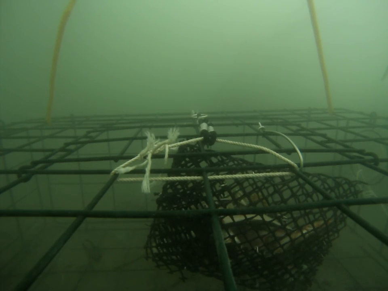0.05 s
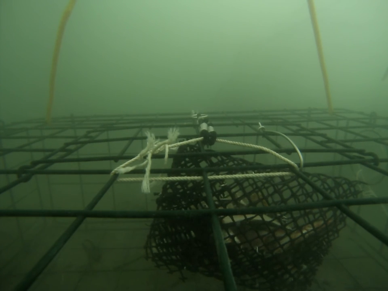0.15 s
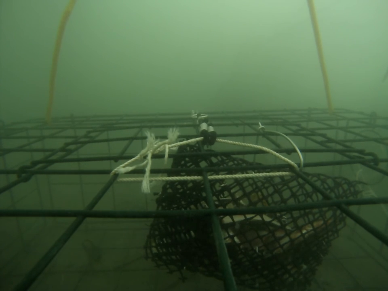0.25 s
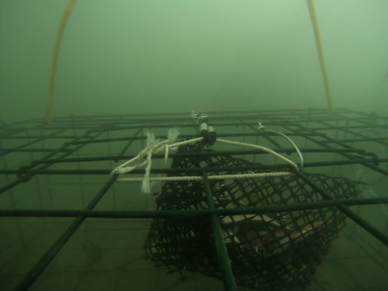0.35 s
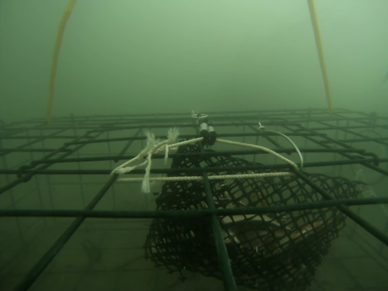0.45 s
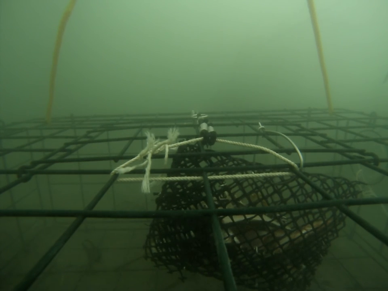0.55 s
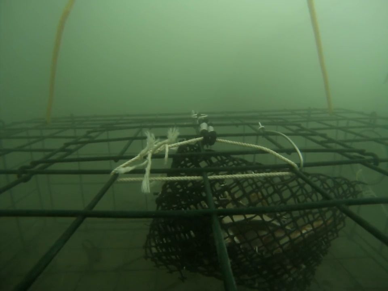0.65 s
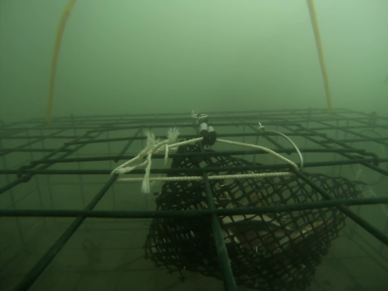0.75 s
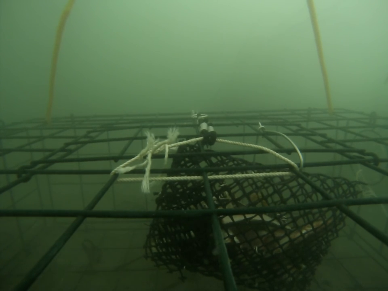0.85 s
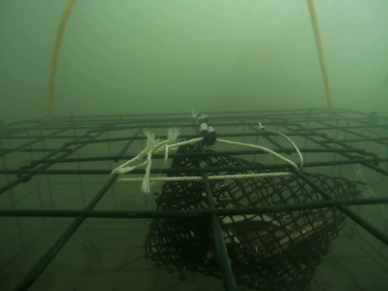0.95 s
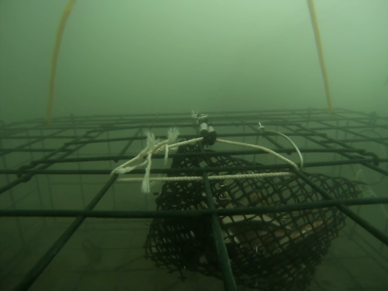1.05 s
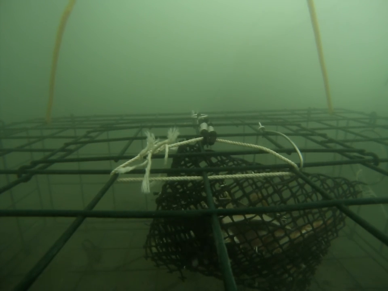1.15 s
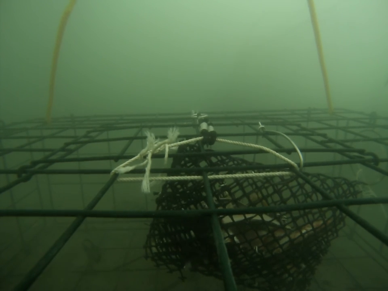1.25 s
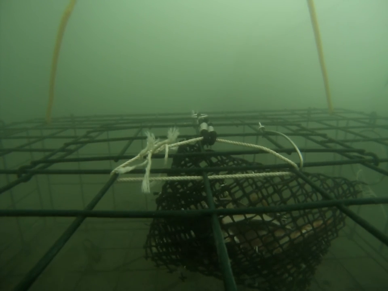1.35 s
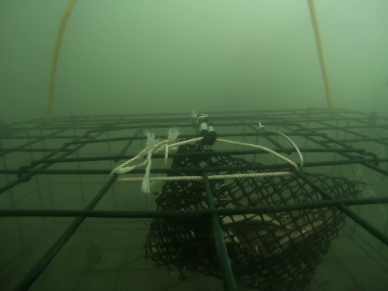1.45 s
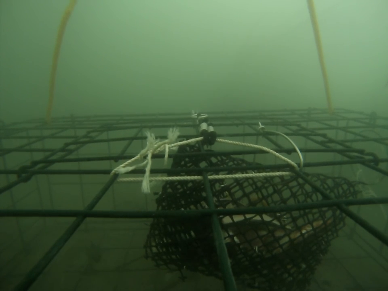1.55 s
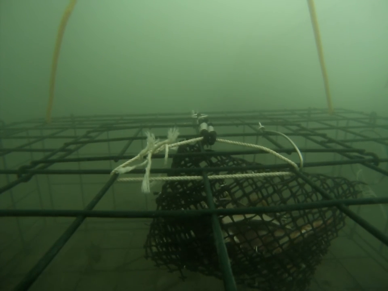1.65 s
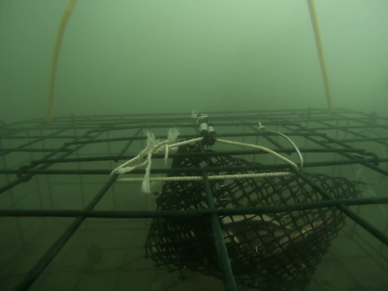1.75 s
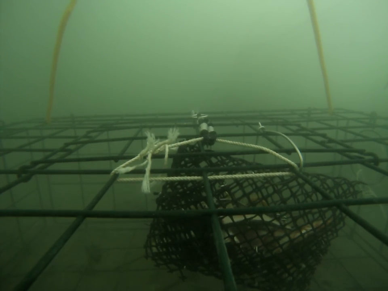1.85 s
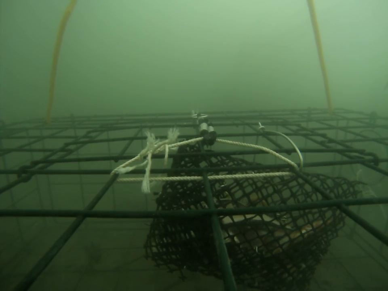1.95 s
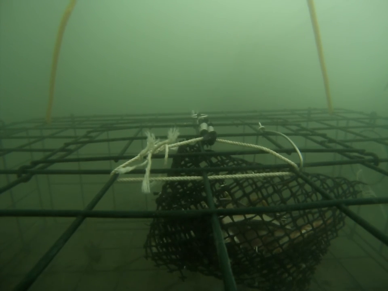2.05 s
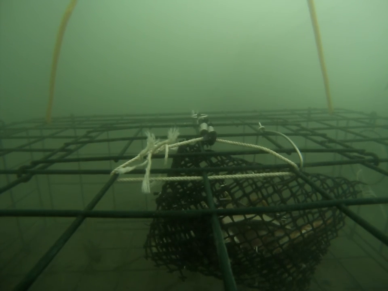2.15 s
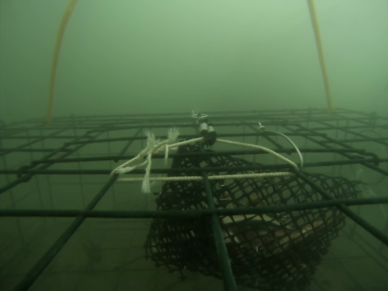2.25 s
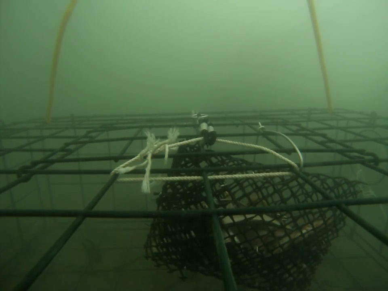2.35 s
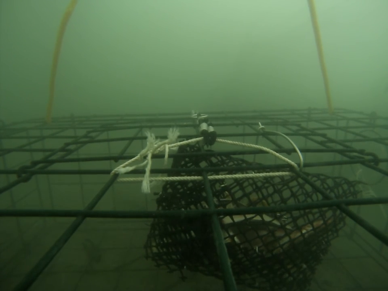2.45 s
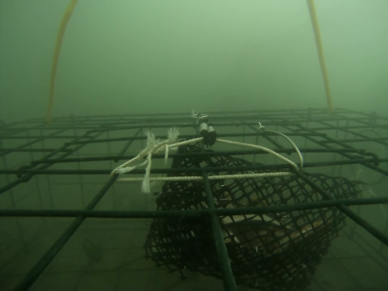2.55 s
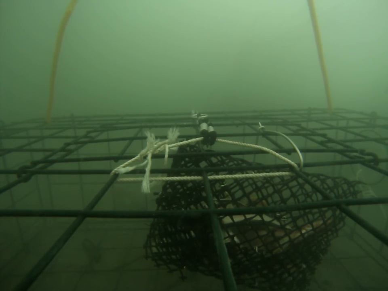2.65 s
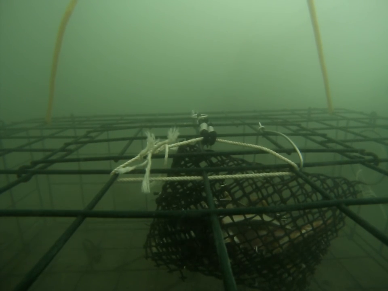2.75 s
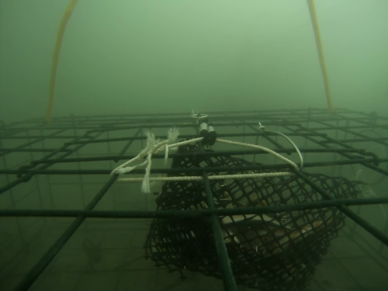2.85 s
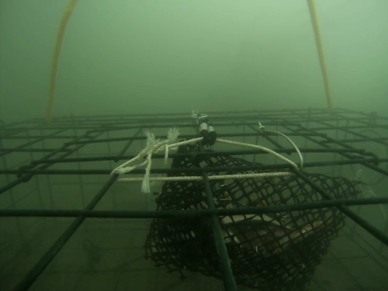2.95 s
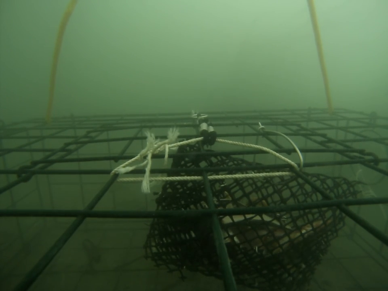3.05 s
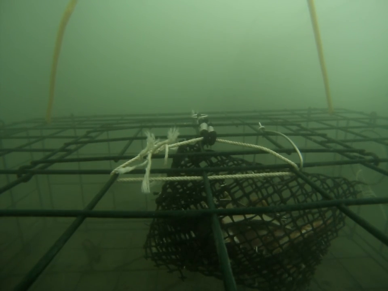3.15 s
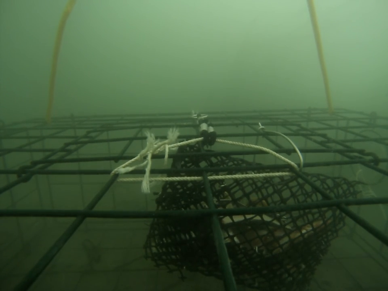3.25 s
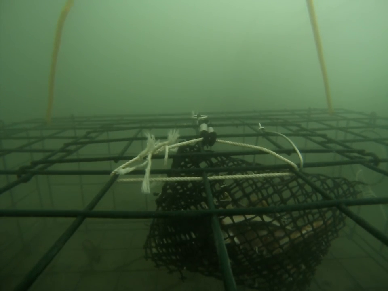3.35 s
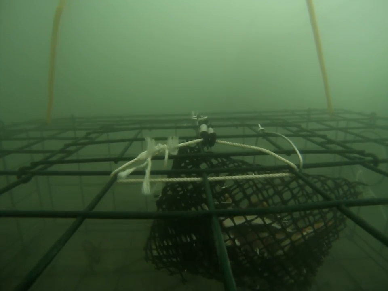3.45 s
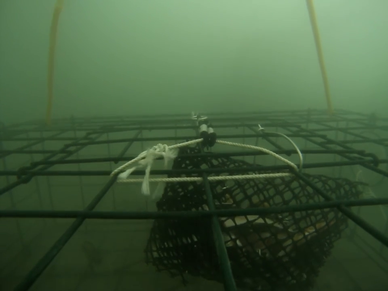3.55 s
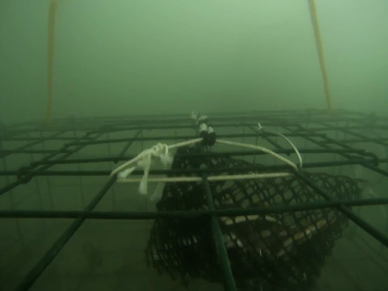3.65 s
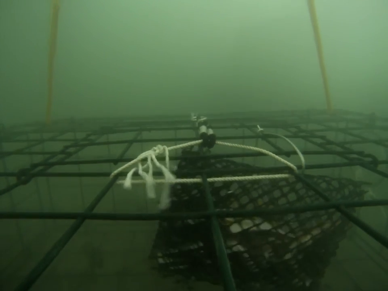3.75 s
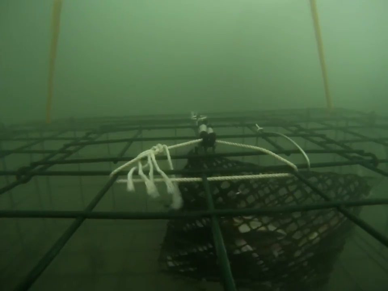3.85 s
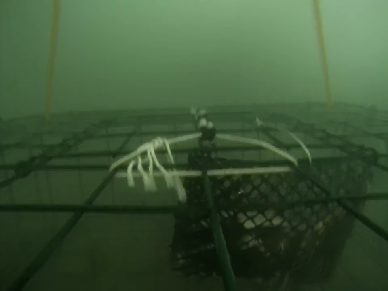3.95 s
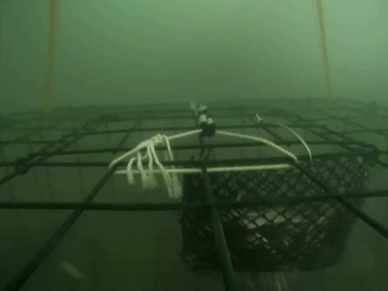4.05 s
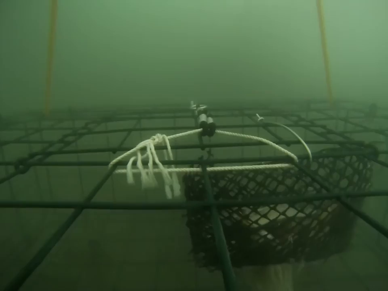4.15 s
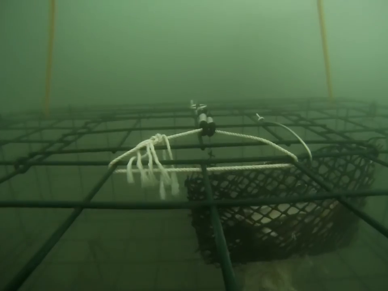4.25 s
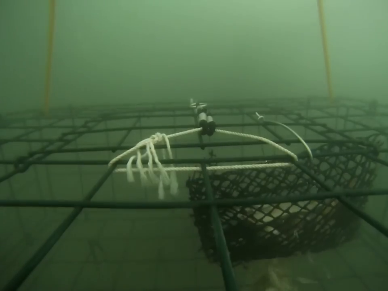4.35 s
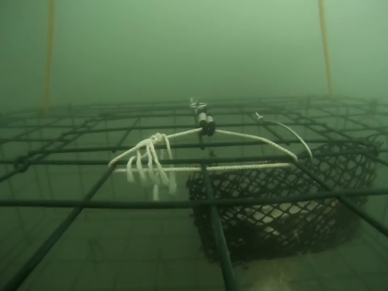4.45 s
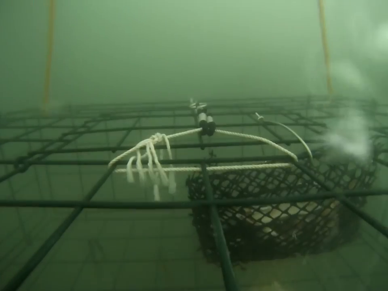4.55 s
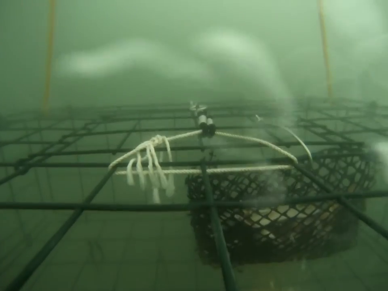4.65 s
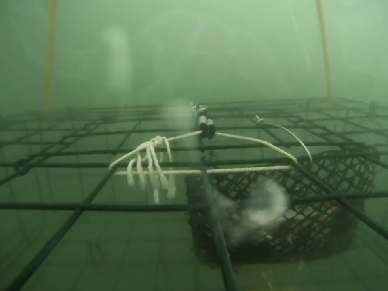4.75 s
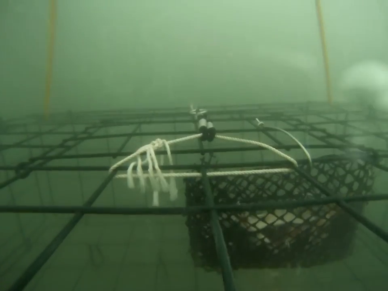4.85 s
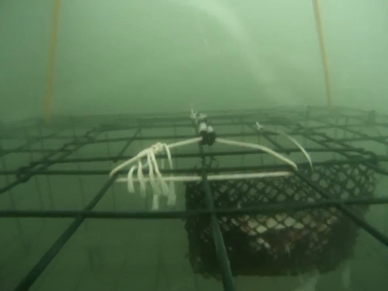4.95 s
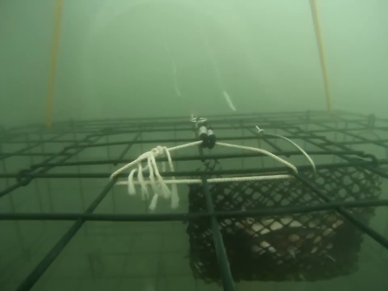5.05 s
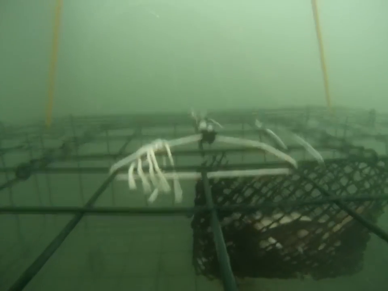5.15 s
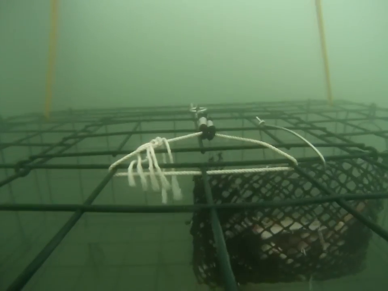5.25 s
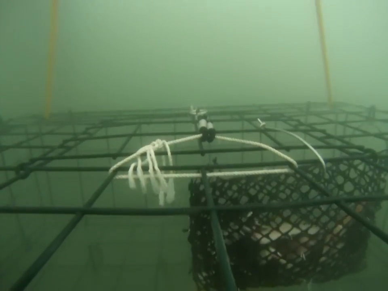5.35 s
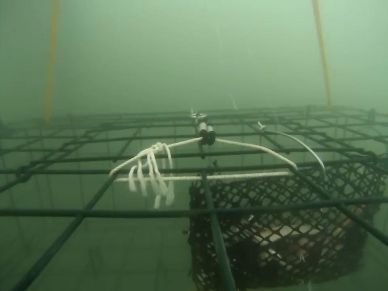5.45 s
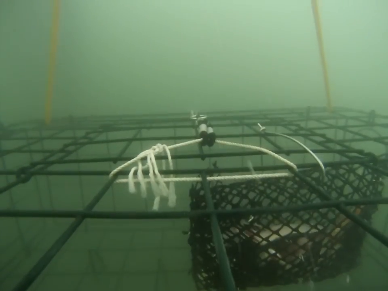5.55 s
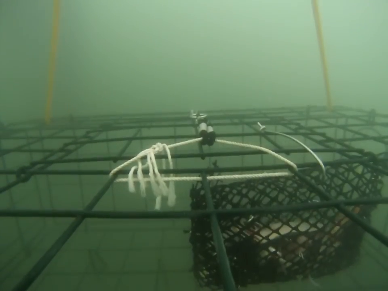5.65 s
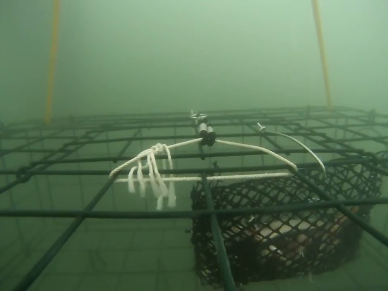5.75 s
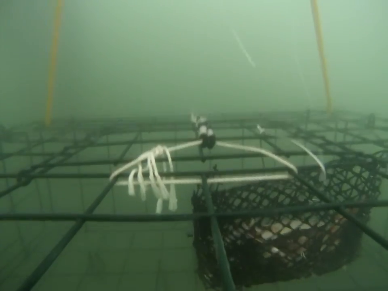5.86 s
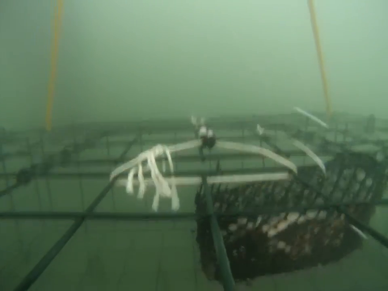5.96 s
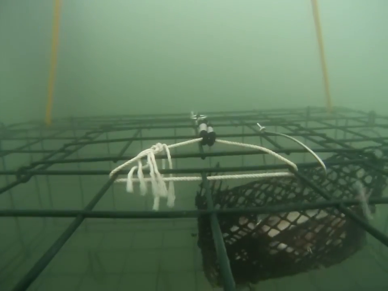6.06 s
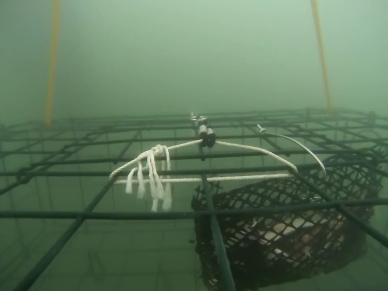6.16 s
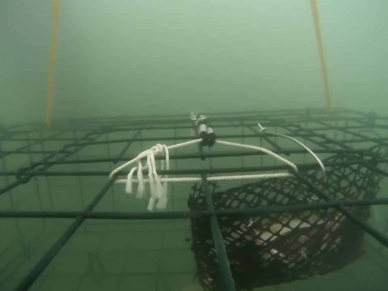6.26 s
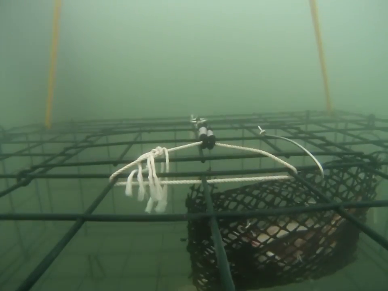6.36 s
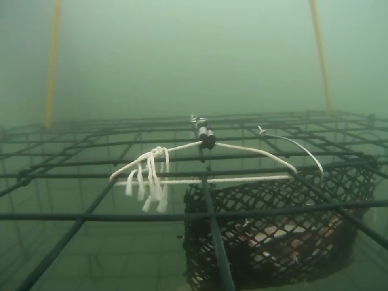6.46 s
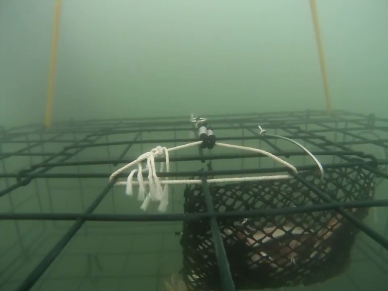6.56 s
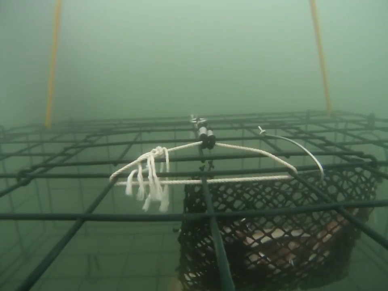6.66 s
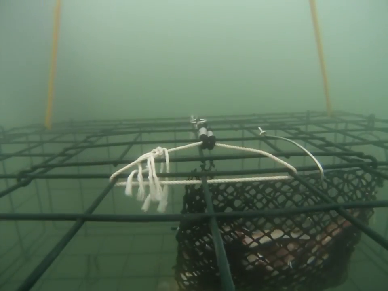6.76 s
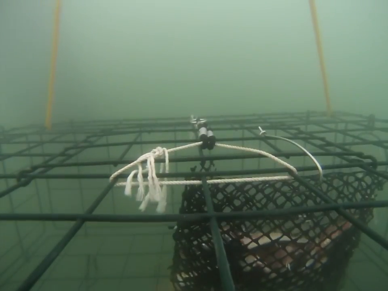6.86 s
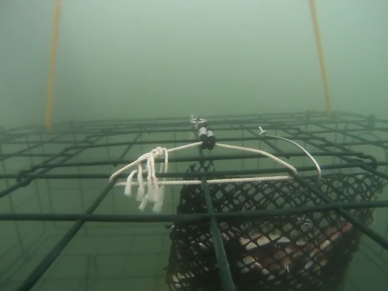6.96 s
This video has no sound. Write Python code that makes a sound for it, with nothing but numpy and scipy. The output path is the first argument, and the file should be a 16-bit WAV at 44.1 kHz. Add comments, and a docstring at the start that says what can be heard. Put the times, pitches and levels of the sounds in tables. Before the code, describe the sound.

From 0 to 3.6 s it is very quiet underwater: a faint low rocking rumble, thin soft hiss, and small irregular dull taps on the wire trap, slightly clearer near 1.0, 2.05, 2.25 and 2.6 s, then almost nothing around 3 s. At 3.65 s a hard, short metallic knock breaks the calm, followed by more at 3.75 and 3.9 s. A deep thump at 4.2 s begins the haul: low throbbing hum, gurgling water rush and bubbles swell, with a very sharp tick at 4.52 s and dense knocks, clicks and wiry rattles to 5.2 s. A heavy knock and hard snap come at 5.4 s, then a flurry of ticks around 5.75-5.85 s. A big low thump lands at 6.2 s; muffled knocks, brief ringing and strong deep buffeting continue at 6.4-6.7 s, and the water still rumbles at the 7 s end. Close, boxy, muffled, mono.

```python
"""Small knocks over a faint low rumble, then a hard jerk, thrumming, rushing water, rattles and ticks.
A wire trap with a camera housing fixed to it lies on the seabed, then is hauled up by its rope.
Contacts and flow are shaped noise driven through resonances of frame, housing, mesh and loose wire;
bubbles, ticks and single ringing modes use short dying sines.
The housing wall muffles whatever shakes it as a whole."""
import sys
import numpy as np
from scipy import signal
from scipy.fft import rfft, irfft, next_fast_len
from scipy.io import wavfile
from scipy.ndimage import uniform_filter1d, map_coordinates

SR = 44100
rng = np.random.default_rng(int(sys.argv[2]) if len(sys.argv) > 2 else 0)


def pcm_store(signal):
    """Save signal as 16-bit PCM."""
    levels = np.round(np.clip(np.atleast_2d(signal), -1, 1) * 32767)
    wavfile.write(sys.argv[1], SR, levels.astype(np.int16).T)


N = 308259
TOP_HZ = 15250  # band limit


def amp(db):
    """Gain of a level in dB."""
    return 10 ** (np.asarray(db) / 20)


def unit(x):
    """x at rms 1."""
    return x / np.sqrt(np.mean(np.abs(x) ** 2) + 1e-20)


def noise():
    """White noise of rms 1 over the scene."""
    return rng.standard_normal(N)


def curve(rows):
    """(t/s, level/dB) rows interpolated to one dB value per sample."""
    t_s, level_db = np.transpose(rows)
    return np.interp(np.arange(N) / SR, t_s, level_db)


def wobble(knots_per_s):
    """Smooth random curve through normally distributed knots."""
    knots = rng.standard_normal(int(N * knots_per_s / SR) + 4)
    return map_coordinates(knots, [np.arange(N) * knots_per_s / SR])


def filtered(x, response):
    """x times a complex response of frequency."""
    m = next_fast_len(N + SR // 2)
    return irfft(rfft(x, m) * response(np.fft.rfftfreq(m, 1 / SR)), m)[:N]


def rung(drive, modes):
    """Drive through parallel resonances, twice for steep skirts; white noise of rms 1 stays near rms 1."""
    def one_pass(f):
        total = 0
        for k, (hz, width_hz, db) in enumerate(modes):
            damping = 1j * f * width_hz
            sign = (-1) ** k  # neighbouring modes alternate in sign
            total = total + sign * amp(db / 2) * damping / (hz * hz - f * f + damping)
        return total

    grid_hz = np.linspace(1, SR / 2, 20000)
    rms_gain = np.sqrt(np.mean(np.abs(one_pass(grid_hz)) ** 4))
    return filtered(drive, lambda f: one_pass(f) ** 2 / rms_gain)


def gritty(per_s, life_s, lumpy_db):
    """Noise of rms 1 whose level jumps at random small contacts and decays with time constant life_s."""
    hits = (rng.random(N) < per_s / SR) * amp(lumpy_db * rng.exponential(size=N))
    shape = signal.lfilter([1], [1, -np.exp(-1 / (life_s * SR))], hits)
    return unit((1 + shape) * noise())


def bursts(times_s, levels_db, t60s, rise_s, blow_db, strike_db=16.5):
    """Sharp contacts, each with chatter noise: a short hard blow, then a slower decay."""
    power, strike = np.zeros(N + SR), np.zeros(N)
    t = np.arange(SR // 3) / SR
    for s, db, t60 in zip(times_s, levels_db, t60s):
        fall = amp(-60 * t / t60) + amp(blow_db - 60 * t / 0.0029)  # blow t60: 2.9 ms
        chatter = amp(db) * fall * (1 - np.exp(-t / rise_s))
        power[round(s * SR):][:len(t)] += chatter ** 2
        strike[round((s + rise_s) * SR)] = amp(db + strike_db)
    return np.sqrt(power[:N]) * noise() + strike


def bubbling(count, low_hz, spread, cycles):
    """Bubbles shed from the mesh: rising blips, start pitch from low_hz to spread * low_hz; rms 1."""
    when, pitch, size = rng.random((count, 3)).T
    hz = (low_hz * spread ** pitch)[:, None]
    t = np.arange(SR // 20) / SR
    fade = amp(-60 * t * hz / cycles) * (1 - np.exp(-t * hz))  # down 60 dB after this many cycles
    blips = (.4 + size ** 2)[:, None] * fade * np.sin(2 * np.pi * hz * t * (1 + t))
    at = (when * N).astype(int)[:, None] + np.arange(len(t))
    return unit(np.bincount(at.ravel(), blips.ravel(), N)[:N])


# noise spectrum: (f/Hz, relative density/dB)
HISS_SPECTRUM = [(300, -2), (800, -4.5), (2000, -11.5), (4000, -16), (6500, -19), (8000, -24.5),
                 (11800, -26), (12600, -36), (15500, -47)]


def hiss():
    """The microphone's own noise: white noise given a falling spectrum."""
    hz, db = np.transpose(HISS_SPECTRUM)
    shaped = filtered(noise(), lambda f: amp(np.interp(np.log(f + 1), np.log(hz), db)))
    return amp(-60.5) * unit(shaped)


# slow rocking of the housing: (t/s, level/dB)
ROCKING = [(0, -40.5), (1.5, -38.5), (3.1, -42), (3.35, -35.5), (3.93, -35.5), (4.3, -34), (4.55, -32.5),
           (6.99, -29.5)]
# buffeting by moving water: (t/s, level/dB)
BUFFET = [(0.0, -52.5), (2.74, -67), (3.0, -61.5), (4.05, -39.5), (4.19, -28.5), (4.73, -26), (5.99, -29),
          (6.17, -26), (6.42, -17.5), (6.6, -32.5), (6.65, -18), (6.72, -22), (6.99, -28.5)]


def sway():
    """The housing rocks slowly; moving water buffets it: two low, broad noise resonances."""
    rocking = rung(noise(), [(13.5, 12.7, 0)])
    rocking = filtered(rocking, lambda hz: 1 / (1 + (hz / 25) ** 5))
    buffet = rung(amp(3.0 * wobble(12)) * noise(), [(42.0, 210, 0)])
    return amp(curve(ROCKING)) * unit(rocking) + amp(curve(BUFFET)) * unit(buffet)


# water and grit through the trap: (t/s, strength/dB)
FLOW = [(0.0, -46), (0.15, -52.5), (0.84, -60.5), (1.56, -50), (1.81, -52.5), (2.55, -54), (2.7, -45),
        (3.15, -54), (3.7, -51), (3.87, -36), (3.93, -30.5), (4.3, -28), (4.59, -18.5), (4.75, -23),
        (5.04, -20), (5.41, -26), (5.74, -19), (5.94, -23.5), (6.01, -25), (6.33, -24.5), (6.48, -24.5),
        (6.53, -28.5), (6.61, -29.5), (6.66, -27.5), (6.695, -32), (6.76, -25.5), (6.84, -33), (6.95, -23),
        (6.99, -28.5)]
FULL_FLOW_DB = -24  # strength at which with_flow returns level_db unchanged


def with_flow(level_db, grows_db_per_db):
    """A level in dB that rises and falls with the flow."""
    return level_db + grows_db_per_db * (curve(FLOW) - FULL_FLOW_DB)


def mesh_gain():
    """The mesh grows faster than the flow strength: 1.43 dB per dB."""
    return amp(with_flow(-34.5, 1.43))


# steady drive of the frame's two lowest modes: (t/s, level/dB)
THRUM = [(0.0, -43), (0.6, -57.5), (3.05, -57), (3.7, -29.5), (4.0, -34.5), (4.4, -24), (4.94, -27.5),
         (5.2, -31.5), (5.5, -23.5), (5.82, -34.5), (6.1, -37), (6.42, -26.5), (6.6, -36.5), (6.99, -25.5)]
# jerks on the rope: (peak t/s, level/dB, rise/s, lean to the upper mode/dB)
TUGS = [(0.88, -51.5, 0.087, -0.5), (1.15, -44, 0.087, -3), (1.73, -42, 0.056, -0.5),
        (1.95, -41, 0.034, -2), (2.07, -38.5, 0.046, 2.5), (2.21, -39.5, 0.053, 1.5),
        (2.592, -39, 0.094, -2), (3.18, -50, 0.025, 4.5), (3.3, -41, 0.013, 4), (3.449, -42.5, 0.038, 6),
        (3.832, -28.5, 0.043, -6), (4.111, -27.5, 0.055, 5), (4.24, -19.5, 0.015, 2.5),
        (4.269, -25, 0.043, 3), (4.38, -33, 0.039, -6), (4.46, -28, 0.03, -5), (4.53, -31, 0.012, 0),
        (4.58, -23.5, 0.038, 0.5), (4.68, -24, 0.031, 10), (4.8, -27, 0.022, 11), (4.88, -27, 0.038, 7),
        (4.955, -15, 0.021, -0.5), (5.07, -22, 0.032, 1.5), (5.16, -26, 0.03, -5), (5.25, -22, .025, -5),
        (5.31, -19.5, 0.046, 7.5), (5.42, -21.5, 0.059, -3), (5.52, -20.5, 0.033, -4),
        (5.63, -17.5, 0.039, 2), (5.728, -19, 0.032, 6), (5.83, -20, 0.028, 5.5), (5.9, -22, 0.028, -2),
        (6.66, -18.5, 0.017, -3), (6.95, -30, 0.015, 4)]
TUG_FALL_RISES = 1.49  # fall time / rise time
LOWER_DB, UPPER_DB, UPPER_GROWS_DB_PER_DB, FLUTTER_DB = -3, -3, 0.12, 1.5


def tugs(side):
    """Gaussian swells of the drive as jerks set the frame swinging; side: -1 lower mode, +1 upper."""
    t, swells = np.arange(N) / SR, np.zeros(N)
    for s, db, rise_s, lean_db in TUGS:
        width_s = np.where(t < s, rise_s, TUG_FALL_RISES * rise_s)
        swells += amp(db + side * lean_db) * np.exp(-((t - s) / width_s) ** 2)
    return swells


def evened(x):
    """x with its 40 ms level swings reduced; rms 1."""
    power = uniform_filter1d(unit(x) ** 2, size=SR // 25)
    return unit(x / np.sqrt(power + .15))


def thrum():
    """Eddies behind the bars and rope tugs drive two frame modes, more evenly than pure chance."""
    steady = amp(curve(THRUM))
    lower_db = LOWER_DB + FLUTTER_DB * wobble(13)
    upper_db = with_flow(UPPER_DB, UPPER_GROWS_DB_PER_DB) + FLUTTER_DB * wobble(11)
    lower = evened(rung(noise(), [(98.6, 32, 0)]))
    upper = evened(rung(noise(), [(139.8, 35.3, 0)]))
    return (steady + tugs(-1)) * amp(lower_db) * lower + (steady + tugs(1)) * amp(upper_db) * upper


# modes of frame, housing, lower mesh, upper mesh: (f/Hz, width per pass/Hz, relative level/dB)
FRAME_MODES = [(218.1, 23, 5), (337, 119.5, 0.5)]
HOUSING_MODES = [(594, 277, -2.5), (766, 102.4, 9), (810, 149, -3)]
LOWER_MESH_MODES = [(1011, 173, 11), (1202, 417, 9.5), (1513, 350, 5.5)]
UPPER_MESH_MODES = [(1692, 294, 1), (2195, 320, 4), (2630, 250, -5.5)]
# sharp modes of the trap: (f/Hz, relative level/dB)
TRAP_MODES = [(598, -7), (710, 0.5), (820, 1), (940, -11.5), (1120, -5.5), (1245, -4.5), (1475, -8),
              (1725, -14.5), (1840, -7.5), (2180, -12.5), (2400, -15.5)]


def drag():
    """Flow and grit shake frame, housing and mesh with a shared surge; bubbles gurgle."""
    surge = amp(1.8 * wobble(11))
    shake = surge * gritty(per_s=90, life_s=.008, lumpy_db=.7)
    frame = amp(-5.5) * rung(shake, FRAME_MODES) + amp(-9.0) * rung(shake, HOUSING_MODES)
    frame += amp(-14.0) * bubbling(count=1400, low_hz=520.0, spread=1.7, cycles=41)  # larger bubbles
    frame += amp(-17.5) * rung(shake, [(hz, 30, db) for hz, db in TRAP_MODES])
    fine = surge * gritty(per_s=200, life_s=.003, lumpy_db=2.5)
    mesh = amp(-7.0) * rung(fine, LOWER_MESH_MODES) + amp(-11.0) * rung(fine, UPPER_MESH_MODES)
    mesh += amp(-14.0) * bubbling(count=700, low_hz=1450, spread=1.7, cycles=45)
    return amp(curve(FLOW)) * frame + mesh_gain() * mesh


def specks(per_s):
    """Sand grains and tiny bubbles strike the housing: sub-millisecond noise clicks, rms 1."""
    hits = (rng.random(N) < per_s / SR) * amp(np.minimum(6 * rng.exponential(size=N), 11))
    clicks = signal.lfilter([1], [1, -np.exp(-1 / (.0006 * SR))], hits) * noise()
    return unit(rung(clicks, [(7000, 8000, 0)]))


# loose wire modes: (f/Hz, width per pass/Hz, relative level/dB)
WIRE_MODES = [(2720, 220, -5.5), (3093, 120, 2.5), (3370, 110, -1), (3780, 130, -3.5), (4156, 180, -6.5),
              (4925, 180, -9), (5480, 250, -11.5), (6700, 700, -20), (7380, 240, -16)]


def fizz():
    """Flow hums in the loose wire, sheds fine bubbles and throws specks at the housing."""
    hum = rung(gritty(per_s=150, life_s=.004, lumpy_db=3), WIRE_MODES)
    spray = bubbling(count=260, low_hz=2600, spread=1.4, cycles=60)
    return mesh_gain() * (amp(-27.5) * hum + amp(-29.5) * spray + amp(-44.0) * specks(per_s=14))


# low single thumps of the housing: (middle t/s, level/dB, f/Hz)
THUMPS = [(4.2275, -5.5, 138), (5.425, -9.5, 130), (6.2064, -4, 117), (6.656, -13.5, 120)]
THUMP_HALF_CYCLES = 0.42  # half length of a thump, in cycles


def thumps():
    """Each thump is one swing forth and back without ring: a sine under a narrow Gaussian."""
    t, out = np.arange(N) / SR, np.zeros(N)
    for s, db, hz in THUMPS:
        cycles = (t - s) * hz
        out -= amp(db) * np.sin(2 * np.pi * cycles) * np.exp(-(cycles / THUMP_HALF_CYCLES) ** 2)
    return out


# a wire snaps against the housing: (t/s, level/dB)
SNAPS = [(5.4237, -3), (5.4285, -2.5)]
# housing shell modes: (f/Hz, width per pass/Hz, relative level/dB)
SHELL_MODES = [(1520, 540, 2.5), (3430, 700, -6.5), (4900, 500, -7), (7550, 1500, -25)]


def snaps():
    """A one-sample hard contact rings all the shell modes."""
    t_s, db = np.transpose(SNAPS)
    blows = np.zeros(N)
    blows[np.round(t_s * SR).astype(int)] = amp(db)
    return rung(blows, SHELL_MODES)


# ticks, short pitched rings and bright clicks: (t/s, level/dB, start f/Hz)
TICKS = [(2.311, -41, 2400), (4.059, -22.5, 3140), (4.226, -41.5, 5640), (4.228, -48, 11100),
         (4.3654, -35.5, 4300), (4.366, -41, 8500), (4.366, -42, 12130), (4.427, -21, 1690),
         (4.4725, -30.5, 7470), (4.5247, -3, 2100), (4.541, -31, 3900), (4.56, -16, 1710),
         (4.5608, -46, 13100), (4.573, -8.5, 2090), (4.6103, -35, 5210), (4.6143, -13.5, 1900),
         (4.6326, -33, 7730), (4.631, -17, 2030), (4.7113, -24.5, 4430), (4.7372, -52, 10000),
         (4.7378, -20, 2480), (4.8586, -11.5, 2015), (4.864, -40, 6310), (4.8747, -38, 5440),
         (4.921, -41, 11000), (4.946, -13.5, 2100), (5.1262, -8, 2070), (5.41, -30, 2770),
         (5.46, -46, 4700), (5.3905, -37.5, 6840), (5.3937, -15.5, 2130), (5.572, -22, 1800),
         (5.654, -21.5, 1960), (5.499, -36, 7200), (5.506, -46, 13500), (5.5819, -35.5, 6730),
         (5.746, -20, 1750), (5.76, -19, 1800), (5.77, -17.5, 1740), (5.776, -33, 3250), (5.784, -17, 1750),
         (5.787, -43, 8900), (5.7994, -13.5, 1830), (5.809, -16.5, 1910), (5.821, -18, 1740),
         (5.834, -19.5, 1850), (5.9, -26, 1750), (5.9478, -26.5, 3190), (6.2089, -44.5, 7500)]
SNAP_DB, SNAP_T60_S = 10.5, 0.0066
FADE_CYCLES_AT_2KHZ, FADE_EXPONENT = 32.8, 0.3  # higher pitches ring for more cycles


def ticks():
    """Each tick snaps, a filtered noise burst, and rings briefly at its own slightly rising pitch."""
    out, t = np.zeros(N + SR), np.arange(SR // 12) / SR
    for s, db, hz in TICKS:
        cycles = FADE_CYCLES_AT_2KHZ * (hz / 2000) ** FADE_EXPONENT
        build = (1 - np.exp(-t * hz / 2.18)) ** 2  # over a few cycles
        ring = amp(4 - 60 * t * hz / cycles) * np.sin(2 * np.pi * hz * t * (1 + .8 * t))
        snap = amp(SNAP_DB - 60 * t / SNAP_T60_S) * rng.standard_normal(len(t))
        snap = signal.lfilter(*signal.butter(7, min(1.3 * hz, TOP_HZ), fs=SR), snap)
        snap = signal.lfilter(*signal.butter(1, hz / 3, fs=SR), snap)  # strongest below the ring
        out[round(s * SR):][:len(t)] += amp(db) * (build * ring + snap)
    return out[:N]


# loose wire slaps: (t/s, level/dB)
RATTLES = [(3.654, -50.5), (3.8817, -41.5), (4.426, -42), (4.515, -34), (4.56, -38.5), (4.6037, -34.5),
           (4.646, -38), (4.6883, -40), (4.827, -45), (4.923, -45), (4.9854, -37.5), (5.0325, -37.5),
           (5.064, -37.5), (5.108, -41), (5.16, -39.5), (5.3228, -47), (5.5536, -42), (5.6035, -38),
           (5.6335, -40), (5.675, -52), (5.721, -45.5), (5.7748, -40.5), (5.8203, -34), (5.898, -45.5),
           (6.3783, -41.5)]


def rattles():
    """Loose wire slaps the frame, ringing wire and mesh; the lowest upper-mesh mode answers longer."""
    t_s, db = np.transpose(RATTLES)
    t_s = t_s - .0015
    slap = bursts(t_s, db - 5.0, np.full(len(db), 0.12), rise_s=0.00014, blow_db=-7.5)
    answer = bursts(t_s, db + 6, np.full(len(db), 0.25), rise_s=0.00055, blow_db=-11)
    mesh = amp(7.0) * rung(slap, UPPER_MESH_MODES[1:]) + rung(answer, UPPER_MESH_MODES[:1])
    return rung(slap, WIRE_MODES) + mesh


RING_RISE_PER_T60, RING_WAVER_RAD = 0.014, 0.7


def ringing(rows):
    """Dying sines with a wavering phase; rows: (t/s, level/dB, f/Hz, t60/s)."""
    out, t = np.zeros(N + SR), np.arange(SR // 3) / SR
    for s, db, hz, t60 in rows:
        waver = RING_WAVER_RAD * map_coordinates(rng.standard_normal(40), [t * 100])
        envelope = amp(db - 60 * t / t60) * (1 - np.exp(-t / (RING_RISE_PER_T60 * t60)))
        out[round(s * SR):][:len(t)] += envelope * np.sin(2 * np.pi * hz * t + waver)
    return out[:N]


# one trap mode rings on, a dying tone: (t/s, level/dB, f/Hz, t60/s)
RINGS = [(0.546, -41.5, 630, 0.11), (0.665, -42.5, 637, 0.09), (0.708, -41.5, 894, 0.065),
         (0.957, -46.5, 1850, 0.2), (0.958, -44.5, 640, .15), (1.006, -41, 595, 0.17),
         (1.004, -40, 1098, 0.13), (1.006, -44, 1480, 0.13), (1.125, -44, 350, 0.2), (1.51, -44, 634, 0.31),
         (2.63, -28, 682, 0.1), (3.015, -49, 712, 0.33), (3.6562, -16.5, 752, 0.11),
         (3.656, -17.5, 1505, 0.057), (3.6553, -12, 940, 0.035), (3.6556, -13, 1210, 0.037),
         (3.656, -15.5, 1710, 0.037), (3.69, -37.5, 2130, 0.17), (3.755, -23, 643, 0.084),
         (3.767, -36, 1283, 0.13), (3.882, -16.5, 599, 0.25), (3.882, -21.5, 824, 0.29),
         (3.884, -28, 2184, 0.18), (3.883, -35.5, 3430, 0.1), (3.883, -38.5, 4750, 0.14),
         (4.525, -17.5, 1480, 0.053), (4.678, -11, 705.7, 0.22), (4.72, -17, 575, .15),
         (4.984, -25.5, 1710, 0.14), (5.155, -24.5, 2140, 0.22), (5.327, -28.5, 1175, 0.21),
         (5.33, -34, 2130, 0.19), (5.385, -20.5, 702, 0.21), (5.553, -25.5, 1740, 0.12),
         (6.405, -21, 1251, .15), (6.618, -29, 1250, 0.11), (6.711, -30, 1245, 0.18)]
CLANG_DB, CLANG_SCATTER_DB = -20.5, 3  # level against the knock; random spread per mode
CLANG_T60_RATIO, CLANG_TILT = 0.73, 1  # share of the knock's t60; dB per octave and dB of hardness


def clangs():
    """Every knock rings the trap's sharp modes in a new mix; some single modes ring on longer."""
    struck = []
    for s, db, hard_db, t60 in KNOCKS:
        for hz, mode_db in TRAP_MODES:
            tilt_db = CLANG_TILT * hard_db * np.log2(hz / 700)
            scatter_db = CLANG_SCATTER_DB * rng.standard_normal()
            level_db = db + CLANG_DB + mode_db + tilt_db + scatter_db
            struck.append((s, level_db, hz, CLANG_T60_RATIO * t60))
    return ringing(struck + RINGS)


# knocks on the trap: (t/s, level/dB, hardness/dB, reference t60/s)
KNOCKS = [(0.04, -54.5, 16.5, 0.14), (0.219, -41, 4.5, 0.26), (0.393, -39, -4, 0.065),
          (0.501, -40, -14, 0.14), (0.545, -42.5, 5, 0.079), (0.705, -41.5, -0.5, 0.33),
          (0.807, -38, -3, 0.25), (0.955, -47, 11, 0.43), (1.006, -29, -3, 0.21), (1.123, -37, -2, 0.11),
          (1.29, -41.5, -7, 0.31), (1.509, -43.5, -2, 1), (1.614, -35.5, -5, 0.25), (1.69, -40, -9, 0.19),
          (2.008, -41.5, -19, 0.56), (2.052, -30.5, -17, 0.075), (2.176, -44, -6, 0.42),
          (2.248, -29.5, -10, 0.064), (2.373, -39.5, -6, 0.11), (2.626, -27.5, 1.5, 0.2),
          (2.695, -41, -3, 0.078), (3.171, -56.5, 16.5, 0.36), (3.231, -45, 6.5, 0.5),
          (3.6563, -12.5, 5.5, 0.18), (3.753, -21.5, -2, 0.17), (3.821, -22, -21, 0.32),
          (3.882, -18.5, 7, 0.2), (3.901, -20.5, 8.5, 0.15), (4.217, -10, -5.5, 0.33),
          (4.365, -22, 6, 0.081), (4.42, -17.5, 1.5, 0.75), (4.521, -32.5, 21, 0.077),
          (4.688, -9, -4.5, 0.18), (4.715, -12, -4, 0.11), (4.917, -8.5, -1, 0.21),
          (5.124, -20.5, 8.5, 0.31), (5.154, -15.5, -10, 0.76), (5.322, -29, 8.5, 0.77),
          (5.382, -10, -5, 0.35), (5.409, -9.5, 5.5, 0.12), (6.118, -19.5, 0.5, 0.85),
          (6.202, -22, -8, 0.54), (6.33, -15.5, -2.5, 0.44), (6.402, -10, -4.5, 0.47),
          (6.454, -10.5, -19, 0.12), (6.626, -22, -5, 0.37), (6.712, -12.5, -2.5, 0.34),
          (6.775, -32, 5, 0.34), (6.89, -20, 1.5, 0.35), (6.918, -22.5, -7, 1)]


def knocks():
    """Knocks shake all modes; harder ones reach the high modes more; upper-mesh drive dies soonest."""
    t_s, db, hard_db, t60 = np.transpose(KNOCKS)
    t_s = t_s - .0015  # shaking starts just before the modes speak
    low = bursts(t_s, db - 11 - 0.035 * hard_db, 1.37 * t60, rise_s=0.0016, blow_db=11.0)
    middle = bursts(t_s, db - 9.5, t60, rise_s=0.00037, blow_db=8.0)
    bright = bursts(t_s, db - 17 + hard_db, 0.95 * t60, rise_s=0.00051, blow_db=10.5, strike_db=13)
    sharp_db = db - 23.5 + 1.1 * hard_db
    sharp = bursts(t_s, sharp_db, 0.81 * t60, rise_s=0.0021, blow_db=4.0, strike_db=10)
    body = rung(low, FRAME_MODES) + rung(middle, HOUSING_MODES)
    return body + rung(bright, LOWER_MESH_MODES) + rung(sharp, UPPER_MESH_MODES)


def wall(hz):
    """The housing wall: two cascaded second-order low-passes at 3600 Hz."""
    ratio = hz / 3600
    return 1 / (1 + 1j * ratio * np.sqrt(2) - ratio ** 2) ** 2


def scene():
    """Everything reaches one microphone; the wall muffles the treble of what shakes it as a whole."""
    shaking = sway() + thumps() + thrum() + drag() + knocks() + clangs()
    direct = fizz() + rattles() + ticks() + snaps() + hiss()
    return (filtered(shaking, wall) + direct)[None]


def record(dry):
    """The loudest swings are squeezed towards 0.72; nothing is kept above the band limit."""
    squeezed = dry[0] / (1 + np.abs(dry[0] / .72) ** 8) ** (1 / 8)
    return filtered(squeezed, lambda hz: hz < TOP_HZ)[None]


dry = scene()
out = record(dry)
pcm_store(out)
```